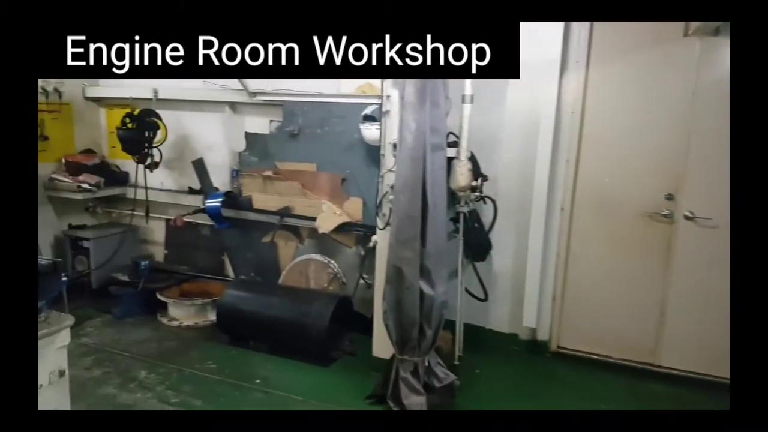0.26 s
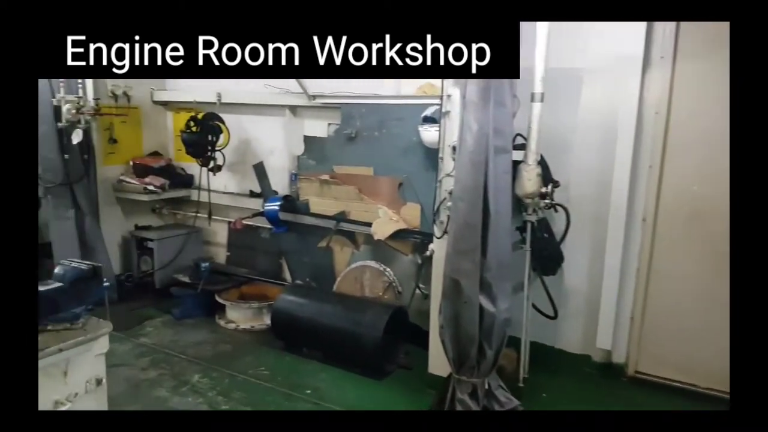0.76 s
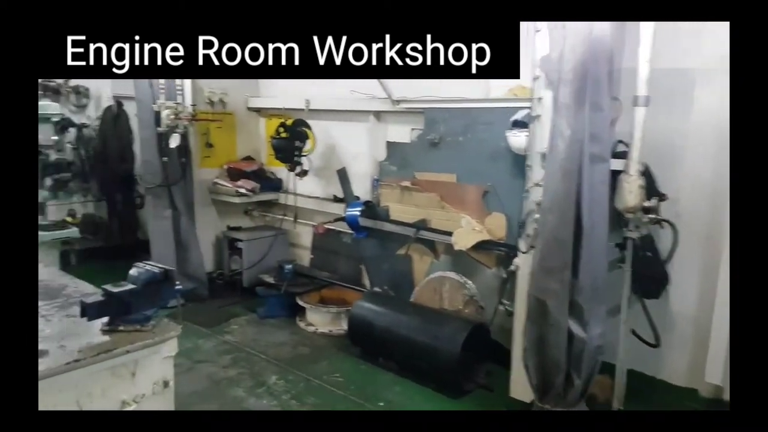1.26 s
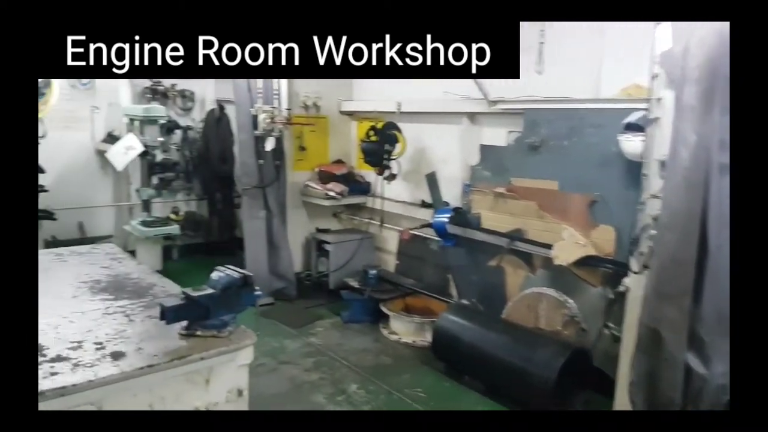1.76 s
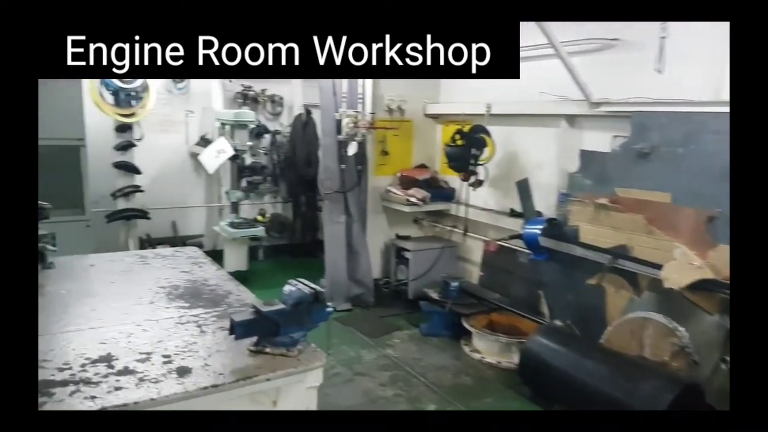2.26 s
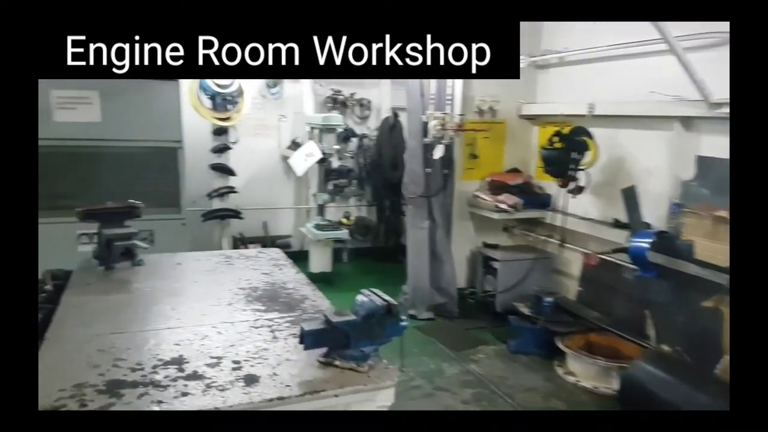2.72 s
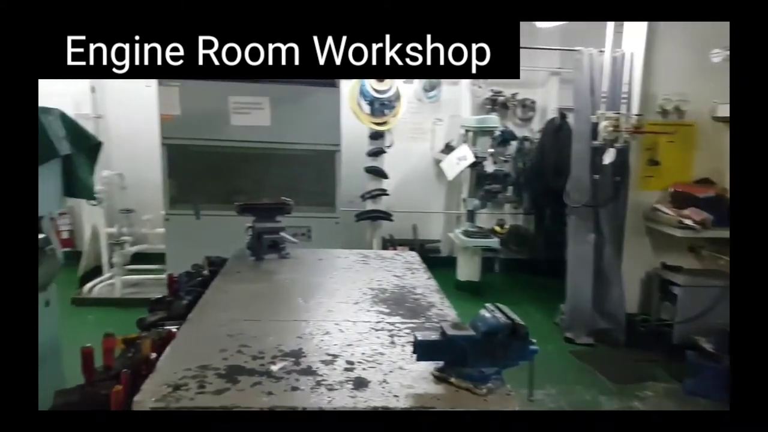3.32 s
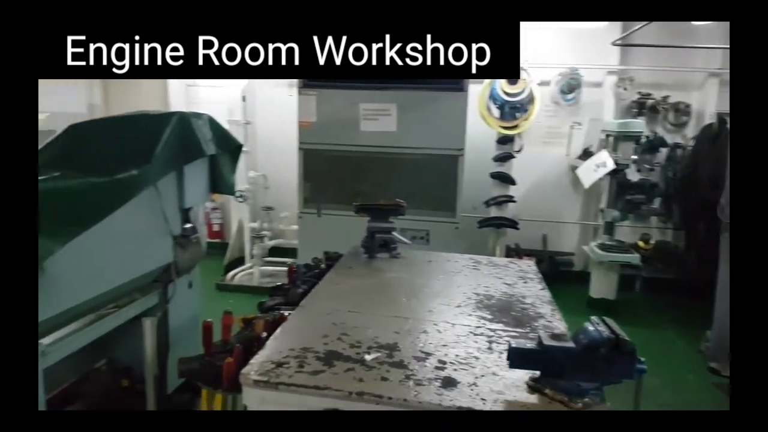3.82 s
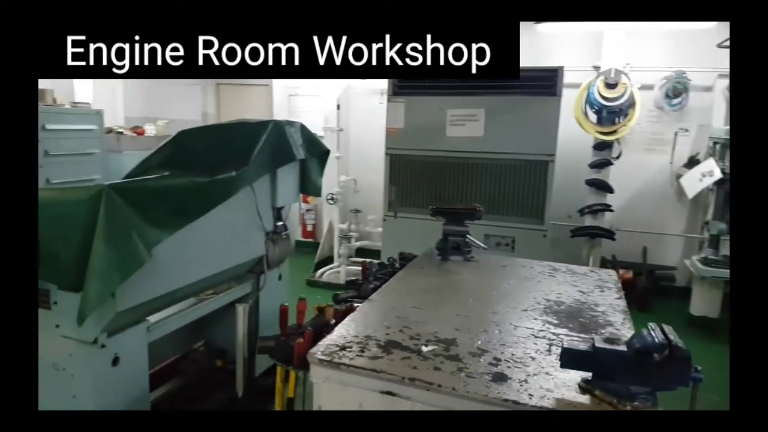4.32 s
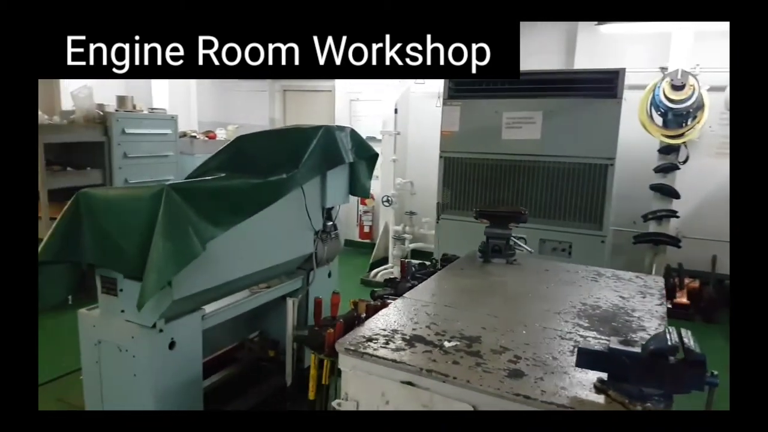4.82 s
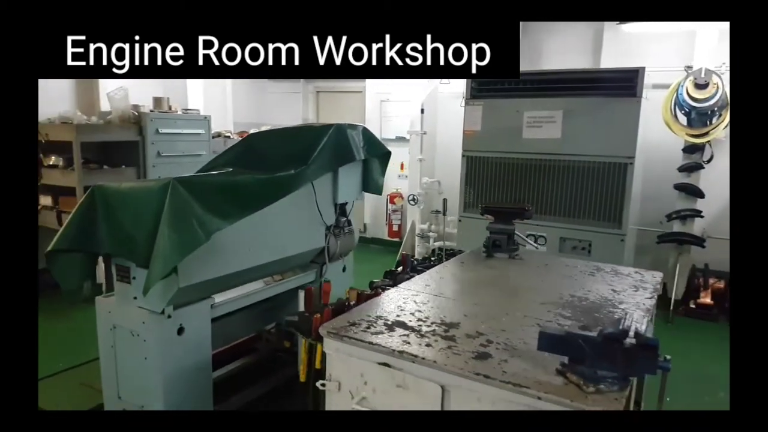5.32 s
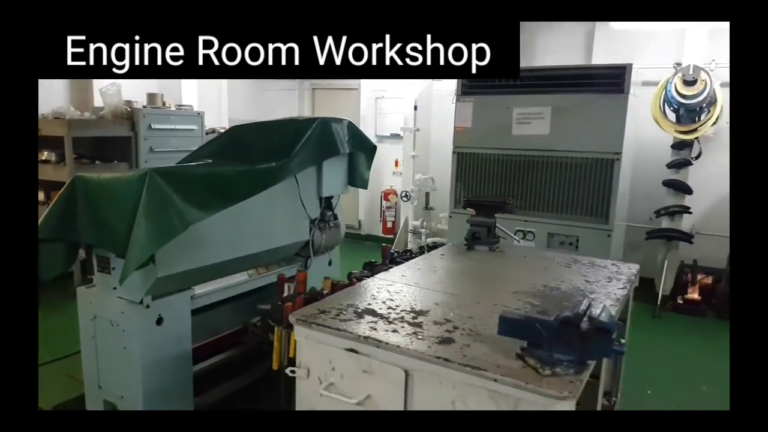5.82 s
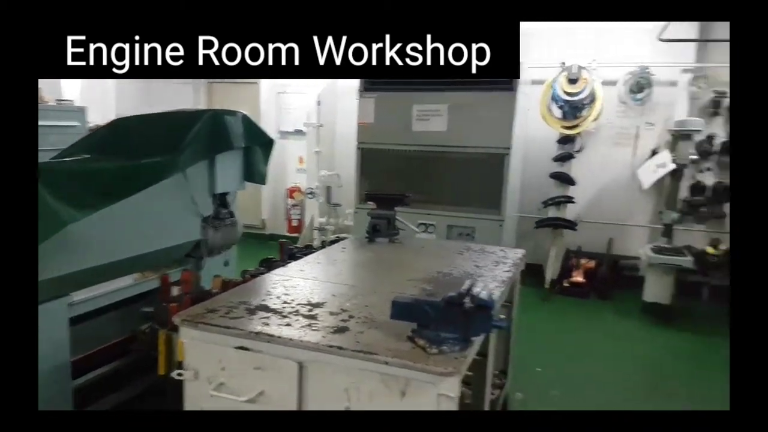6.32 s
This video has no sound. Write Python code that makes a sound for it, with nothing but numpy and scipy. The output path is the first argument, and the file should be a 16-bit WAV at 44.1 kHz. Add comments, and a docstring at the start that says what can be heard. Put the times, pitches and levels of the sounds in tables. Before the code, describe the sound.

Heard from a slowly walking hand-held recorder, the hard metal room is full of unbroken machinery noise: dense low and middle engine hums with a fast flutter, deep ventilation roar, pump and motor tones, and thin whistling gears over a narrow hiss. The balance shifts with position but never stops. Around the middle a sleeve scuffs the microphone softly and briefly, then barely again at the end.

```python
"""The steel-walled workshop of a ship's engine room at sea speed, heard on a slow walk with a hand-held
recorder. Throughout, a four-stroke diesel repeats its cycle six times a second: a dense comb of hums that swell
and fade. Around it filtered noise makes the ventilation roar, wandering tones make the engine, pump motors and
gears hum and whine, and narrow noise bands make the turbocharger hiss. Near three seconds a sleeve brushes
close to the microphone in a run of short noise strokes; a faint one follows near the end."""
import sys
import numpy as np
from scipy import signal
from scipy.fft import rfft, irfft
from scipy.io import wavfile
from scipy.ndimage import uniform_filter1d, minimum_filter1d

SR = 44100
rng = np.random.default_rng(int(sys.argv[2]) if len(sys.argv) > 2 else 0)


def log_audio(samples):
    """Write samples as a 16-bit WAV file to the path given in sys.argv[1]."""
    # one column per channel
    frames = np.atleast_2d(samples).T
    # limit to full scale, then quantise
    limited = np.clip(frames, -1, 1)
    pcm = np.round(limited * 32767).astype(np.int16)
    wavfile.write(sys.argv[1], SR, pcm)


N = 289692
TIME = np.arange(N) / SR  # seconds
FREQS = np.maximum(np.arange(N // 2 + 1) * SR / N, 1)  # Hz
CUTOFF_HZ = 14500  # top of the sleeve's bands; the recorder's top cut is set from it

# how alike the two microphones hear the room: pitch_hz [Hz], likeness [-1 to 1]
MIC_LIKENESS = [(60, 0.98), (180, 0.98), (350, 0.84), (600, 0.49), (800, 0.19), (1050, 0.1), (1550, -0.38),
                (2600, 0.1), (3600, 0.038), (5050, 0.0099), (5750, 0.99), (7500, 0.72), (8700, -0.16),
                (11000, 0.36)]


def from_db(db):
    """Decibels to gain."""
    return 10 ** (np.asarray(db) / 20)


def at_hz(points, hz):
    """Read a spectrum on a log-frequency axis."""
    points = np.array(points)
    return np.interp(np.log(hz), np.log(points[:, 0]), points[:, 1])


def drift(rate, t, size=512):
    """Smooth chance of spread 1 that changes about rate times a second."""
    hz = np.arange(size + 1) / (2 * N / SR)
    smoothing = np.exp(-.5 * (hz / rate) ** 2)
    slow = irfft(rfft(rng.standard_normal(2 * size)) * smoothing)[:size]
    slow = slow / np.sqrt(np.mean(slow ** 2))
    return np.interp(t, np.linspace(0, N / SR, size), slow)


def stereo(mid, side, alike):
    """Left and right from two unrelated signals, with a given likeness."""
    alike = np.clip(alike, -1, 1)
    mid = np.sqrt((1 + alike) / 2) * mid
    side = np.sqrt((1 - alike) / 2) * side
    return np.array([mid + side, mid - side])


def room_noise(gain):
    """Stereo noise arriving from all sides, with the given gain per root Hz."""
    mid, side = rfft(rng.standard_normal((2, N))) * np.sqrt(SR / 2)
    return irfft(gain * stereo(mid, side, at_hz(MIC_LIKENESS, FREQS)), N)


def hum(phase, t, alike, wandering, rate):
    """A tone of rms 1: a steady part plus reflections whose strength and phase wander."""
    wandering = np.clip(wandering, 0, 1)
    sine, cosine = np.sin(phase), np.cos(phase)

    def with_reflections(steady):
        reflections = drift(rate, t) * sine + drift(rate, t) * cosine
        tone = np.sqrt(2 * (1 - wandering)) * steady + np.sqrt(wandering) * reflections
        return tone / tone.std()

    mid = with_reflections(sine)
    side = with_reflections(rng.choice([-1, 1]) * cosine)
    return stereo(mid, side, alike)


def standing_wave(t, db_per_s, crest, node, depth_db):
    """Gain of rms 1 for a steady walk through broad crests and narrow nodes, nearing or leaving the source."""
    trough = from_db(-2 * abs(depth_db))  # as power
    ripple = np.cos(np.pi / 2 * (t - crest) / (node - crest)) ** 2
    swell = from_db(db_per_s * t) * np.sqrt(trough + (1 - trough) * ripple)
    return swell / np.sqrt(np.mean(swell ** 2))


def walk(sound):
    """Each room resonance grows or drains steadily along the walk, and ripples with its crests and nodes."""
    # broad room resonances: pitch_hz [Hz], width_hz [Hz], trend [dB per s],
    # crest_s [s], next_node_s [s], depth_db [dB, sign ignored]
    room_waves = [(40, 30, -1, 3, 5.1, 1.5), (62, 22, 1, 3.5, 5, -1.5), (98, 41, -0.2, 5, 6.2, 2),
                  (176, 47, 1, 4, 4.7, 3), (245, 62, -0.1, 5.5, 5.2, -1), (422, 140, 0, 0, 2.1, 4),
                  (670, 74, 0, 5, 7.9, 3.5)]
    out, spectrum = sound, rfft(sound)
    for hz, width, *wave in room_waves:
        band = irfft(spectrum / (1 + (2 * (FREQS - hz) / width) ** 4), N)
        out = out + band * (standing_wave(TIME, *wave) - 1)
    return out


def diesel(speed_wobble, count=182, size=8):
    """Multiples of the working cycle drone evenly, because neighbours beat at staggered moments of it;
    loud ones arrive directly, weak ones through the room, and shorter waves fade faster along the walk."""
    # loud hums, each a standing wave: order [multiple of the cycle rate], level_db [dB before loud_trim_db],
    # trend [dB per s], crest_s [s], next_node_s [s], depth_db [dB]
    loud_orders = [(14, -33.5, -2.5, 1.4, 2.7, 6), (15, -32.9, -1.5, 1.0, 2.5, 6),
                   (17, -29.5, -3.0, 3.7, 6.8, 6), (18, -32.9, -3.0, 1.3, 4.0, 6),
                   (21, -28.9, 0.0, 2.1, 5.7, 13), (27, -35.1, 0.5, 1.7, 3.4, 3),
                   (28, -28.0, 0.0, -0.3, 3.9, 13), (29, -30.5, 0.0, 0.2, 2.9, 3),
                   (30, -34.8, 0.0, 1.6, 3.3, 13), (31, -36.9, 0.5, -1.3, 2.9, 6),
                   (32, -33.0, 0.0, 2.6, 6.8, 13), (33, -33.1, 0.0, 3.2, 5.9, 18),
                   (36, -35.6, -1.0, 1.4, 3.1, 6), (39, -28.3, 0.0, 2.0, 4.7, 9),
                   (40, -27.3, 0.5, 2.4, 3.7, 3), (42, -37.1, 3.0, 0.7, 1.9, 6),
                   (43, -31.0, 1.0, -0.4, 2.3, 6), (44, -32.6, 2.0, 1.3, 5.5, 18),
                   (45, -35.1, 1.0, -0.7, 2.9, 18), (48, -36.3, 0.5, 0.2, 2.9, 13),
                   (49, -35.6, -1.0, 1.8, 4.1, 6), (53, -35.0, 2.0, 2.5, 5.6, 18),
                   (54, -35.7, -0.5, 0.9, 3.2, 18), (56, -31.0, -2.0, 3.1, 5.1, 13),
                   (59, -34.1, 1.0, 1.9, 2.9, 6), (60, -39.2, 1.5, -1.3, 2.9, 13),
                   (61, -38.4, -1.0, 0.4, 3.1, 9), (63, -35.1, 1.5, 0.9, 1.9, 6),
                   (65, -37.8, 0.0, 2.5, 5.6, 13), (69, -35.6, 0.5, 2.0, 4.7, 13),
                   (70, -33.7, -1.5, 2.7, 4.7, 18), (72, -36.7, -2.0, 0.5, 2.0, 3),
                   (80, -35.4, 1.5, -0.7, 3.5, 9), (81, -37.1, -0.5, 0.2, 1.9, 6),
                   (84, -37.8, 1.0, 1.4, 4.1, 9), (86, -38.2, 0.0, 1.8, 3.8, 9),
                   (87, -39.2, -2.5, 1.3, 2.1, 9), (88, -36.7, 0.0, -0.4, 2.3, 18),
                   (89, -33.2, -0.5, 1.2, 2.0, 6), (93, -37.8, 1.5, 0.1, 2.1, 13),
                   (94, -38.1, 1.0, -0.2, 2.1, 13), (96, -37.8, 0.5, -0.3, 3.3, 6),
                   (97, -36.9, 0.0, 1.0, 2.7, 9), (102, -36.8, -0.5, 0.4, 1.7, 18),
                   (106, -40.0, 1.0, 1.5, 3.8, 13), (121, -40.3, 1.5, -0.1, 4.1, 6),
                   (123, -33.1, 1.0, 3.4, 5.7, 13), (124, -35.4, 0.0, 0.1, 2.1, 18),
                   (125, -36.5, 0.0, 1.5, 3.5, 9), (127, -35.8, 0.0, 1.7, 2.8, 9),
                   (128, -35.4, -0.5, 2.2, 3.9, 13), (131, -36.9, 0.0, 1.3, 2.1, 9),
                   (132, -38.4, -0.5, 0.5, 2.5, 13), (142, -40.1, 0.5, 1.7, 2.7, 6)]
    # all other multiples: pitch_hz [Hz], level_db [dB of each hum]
    weak_orders = [(18, -64), (36, -46.5), (48, -40), (66, -38.5), (140, -39.5), (300, -40.5), (560, -40.5),
                   (680, -44), (790, -41.5), (850, -43), (910, -48), (1000, -48), (1100, -48.5),
                   (1200, -58.5)]
    cycle_hz = 6.016
    beat_stagger = 0.405  # each higher pair of hums beats this share of a cycle later
    beat_blur_db = -36  # hums weaker than this beat out of time
    direct_likeness = 0.6  # a loud hum reaches both microphones at least this alike
    # in a loud hum one strong wave outweighs the reflections; both shares grow towards these with pitch
    loud_wandering, weak_wandering = 0.04, 0.74
    loud_trim_db, fades_per_s = 0.4, 0.18  # the fade rate rises with pitch

    t = TIME[::size]  # computed at a reduced sample rate
    cycle_rate = cycle_hz * (1 + speed_wobble * drift(0.99, t))
    turns = np.cumsum(cycle_rate) * size / SR
    loud = {round(order): row for order, *row in loud_orders}
    direct, diffuse, lag, neighbour = 0, 0, 0, 1
    for order in range(3, count):
        hz = order * cycle_hz
        if order in loud:
            gain = from_db(loud[order][0] + loud_trim_db)
        else:
            gain = from_db(at_hz(weak_orders, hz))
        blur = rng.standard_normal() * from_db(beat_blur_db) / np.sqrt(gain * neighbour)
        lag = lag + 2 * np.pi * beat_stagger * order + blur
        neighbour = gain
        phase = 2 * np.pi * order * turns - lag
        alike = at_hz(MIC_LIKENESS, hz)
        scatter = hz / (hz + 200)
        rate = fades_per_s * (1 + hz / 400)
        if order in loud:
            tone = hum(phase, t, max(alike, direct_likeness), loud_wandering * scatter, rate)
            direct = direct + gain * standing_wave(t, *loud[order][1:]) * tone
        else:
            diffuse = diffuse + gain * hum(phase, t, alike, weak_wandering * scatter, rate)
    direct, diffuse = signal.resample_poly([direct, diffuse], size, 1, axis=2)[:, :, :N]
    return direct + walk(diffuse)


def ventilation():
    """Ventilation and machinery roar: broad shaped noise, coloured by the room along the walk."""
    # pitch_hz [Hz], density_db [dB per Hz, before the room resonances]
    roar_spectrum = [(22, -71.5), (40, -46), (60, -57), (95, -46), (190, -48), (290, -52), (560, -53),
                     (670, -55), (780, -52), (900, -57.5), (1100, -56.5), (1600, -61), (2650, -71.5),
                     (3500, -75.5), (5100, -82.5), (7200, -86.5), (9800, -105.5), (14000, -118)]
    return walk(room_noise(from_db(at_hz(roar_spectrum, FREQS))))


def whines():
    """Motors, pumps and gears, plus two engine tones: machine tones, each with its own flutter; some swell as
    standing waves. The tones at 921.5 and 1107 Hz are multiples of the diesel's cycle."""
    # pitch_hz [Hz], level_db [dB before trim_db], likeness [-1 to 1],
    # wandering [share 0-1], flutter [per s]
    machine_tones = [(1107, -34.7, -.35, .15, 2), (1186, -44, -.4, .5, 3), (1210, -45, .1, .3, 1),
                     (1291, -40, -.4, .15, 1), (1419, -41.8, -.35, .2, 1), (1475, -46.5, -.4, .3, 1.5),
                     (1660, -50, -.25, .3, 1), (1773, -45.5, -.5, .2, 1), (1844, -53, -.3, .4, 1),
                     (2028, -50.5, 0, .3, 1), (921.5, -40.5, .1, .3, 1), (74.5, -43.5, .99, .1, .3),
                     (119.7, -41.5, .98, .4, .5), (178.2, -36, .97, .2, .3), (184.3, -38.5, .97, .2, .3),
                     (277.7, -39.5, .9, .3, .3), (368.5, -41.5, .85, .4, .3)]
    # tones with clear waves in the room, keyed by pitch_hz [Hz]:
    # trend [dB per s], crest_s [s], next_node_s [s], depth_db [dB]
    tone_waves = {1107: (-1.3, 0, 1, 3), 1291: (1, .8, 1.7, 6), 1419: (0, 1.7, 4, 9),
                  1475: (3.7, 2.6, 5.7, 9), 1773: (.5, 0.6, 2.2, 19), 2028: (0, .8, 1.7, 6)}
    trim_db = 0.6
    out = 0
    for hz, db, alike, wandering, flutter in machine_tones:
        swell = standing_wave(TIME, *tone_waves[hz]) if hz in tone_waves else 1
        phase = 2 * np.pi * (hz * TIME + rng.random())
        out = out + from_db(db) * swell * hum(phase, TIME, alike, wandering, flutter)
    return from_db(trim_db) * out


def gear(hz, levels, gain_db, alike, wandering, flutter):
    """A high gear whine: one fluttering tone that comes and goes in quick swells."""
    level_db = np.interp(TIME, *np.transpose(levels))
    return from_db(level_db + gain_db) * hum(2 * np.pi * hz * TIME, TIME, alike, wandering, flutter)


def gears():
    """Two high whines, gear and pinion, swelling independently."""
    # swells of each whine: time_s [s], level_db [dB before gain_db]
    gear_swells = [(0.0, -46), (0.14, -45), (0.27, -57), (0.42, -44.5), (0.6, -57), (0.8, -45), (0.98, -50),
                   (1.13, -44.5), (1.34, -54), (1.58, -43.5), (2.07, -52), (2.22, -42.5), (2.58, -46),
                   (2.7, -54), (2.88, -43.5), (3.2, -48), (3.36, -44.5), (3.68, -58), (4.3, -48.5),
                   (4.56, -53), (4.8, -44), (4.95, -50), (5.1, -41), (5.28, -50), (5.62, -42.5),
                   (5.95, -57), (6.17, -48), (6.56, -50)]
    pinion_swells = [(0.0, -54.6), (0.74, -58), (1.09, -49.6), (1.58, -48), (2.04, -62), (2.56, -52.5),
                     (3.18, -50), (3.65, -61), (4.22, -52), (4.98, -58), (5.55, -51.6), (6.15, -55),
                     (6.56, -62)]
    return (gear(2930, gear_swells, gain_db=0, alike=.5, wandering=.06, flutter=5)
            + gear(3547, pinion_swells, gain_db=-0.5, alike=0.22, wandering=0.24, flutter=7.7))


def rushes():
    """Fast air in the turbocharger and in leaks sings in a few narrow noise bands."""
    # pitch_hz [Hz], nominal_width_hz [Hz, scaled below], level_db [dB],
    # pan_db [dB, left minus right, before the final balance]
    air_bands = [(2380, 210, -46, -1), (2930, 450, -42.5, -1), (3225, 44, -57, -1), (3524, 24, -55, -9),
                 (5820, 250, -47, -5), (8750, 570, -66.5, 17.5), (11640, 460, -72, 10)]
    out = 0
    for hz, width, db, pan_db in air_bands:
        shape = 1 / (1 + ((FREQS - hz) / (0.67 * width)) ** 2)
        shape = shape / np.sqrt(np.sum(shape ** 2) * SR / N)  # equal power whatever the width
        out = out + room_noise(shape) * from_db([[db + pan_db / 2], [db - pan_db / 2]])
    return out


def sleeve(grain_db, pan_db, count=12):
    """Cloth grips quickly, slides and lets go slowly, duller as it slows; threads catch band by band."""
    # strokes: start_s [s], length_s [s], level_db [dB before grain and pan]
    brush_strokes = [(2.887, 0.071, -42), (2.97, 0.04, -54), (3.025, 0.055, -41), (3.078, 0.04, -44),
                     (3.145, 0.012, -51), (6.425, 0.067, -55)]
    # colour of the cloth: pitch_hz [Hz], density_db [relative dB per Hz, before the low cut]
    cloth_spectrum = [(2500, 2), (6000, 2.5), (9000, -4), (11500, 0), (14000, -5.5)]
    attack_s, release_s = 0.026, 0.041
    dulling = 0.41  # how much faster the top fades than the bottom as the cloth slows

    low_cut = FREQS ** 2 / (FREQS ** 2 + 2500 ** 2)
    noise = room_noise(from_db(at_hz(cloth_spectrum, FREQS)) * low_cut)
    spectrum = rfft(noise / noise.std())
    strokes = 0
    for start, length, db in brush_strokes:
        grip = np.clip((TIME - start) / attack_s, 0, 1)
        let_go = np.exp(-np.maximum(TIME - start - length, 0) / release_s)
        strokes = strokes + from_db(db) * grip * let_go
    speed = strokes / strokes.max()
    hiss = 0
    for band in range(count):
        threads = uniform_filter1d(rng.standard_normal(N), size=220)
        catch = from_db(grain_db * threads / threads.std())
        catch = catch / np.sqrt(np.mean(catch ** 2))
        gain = catch * speed ** (dulling * (band / count) ** 2)
        in_band = FREQS * count // CUTOFF_HZ == band
        hiss = hiss + gain * irfft(spectrum * in_band, N)
    return strokes * hiss * from_db([[pan_db / 2], [-pan_db / 2]])


def scene():
    """Drone and roar fill the room; whines and hiss lie on top; the left side is slightly quieter."""
    machines = diesel(speed_wobble=0.00023) + ventilation() + whines() + gears() + rushes()
    return (machines + sleeve(grain_db=2.0, pan_db=3.5)) * from_db([[-.25], [.25]])


def record(dry):
    """The recorder drops the deepest rumble, eases its gain around high peaks and cuts the top."""
    limit = 0.82  # peak amplitude above which the gain eases
    dry = signal.sosfilt(signal.butter(2, 16, "high", fs=SR, output="sos"), dry)
    headroom = limit / np.maximum(np.abs(dry).max(axis=0), limit)
    dry = dry * uniform_filter1d(minimum_filter1d(headroom, size=441), size=441)  # 10 ms windows
    return signal.sosfilt(signal.cheby2(16, 70, CUTOFF_HZ + 600, fs=SR, output="sos"), dry)


dry = scene()
out = record(dry)
log_audio(out)
```